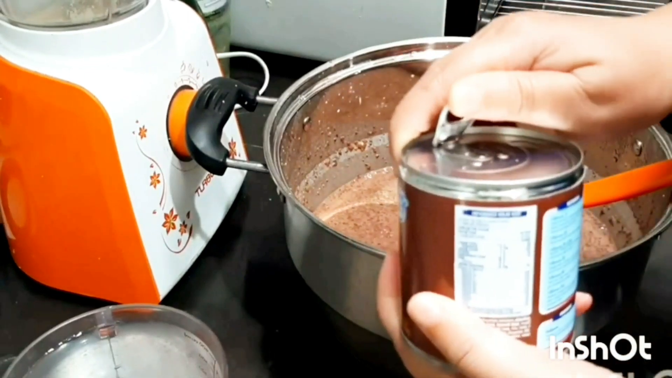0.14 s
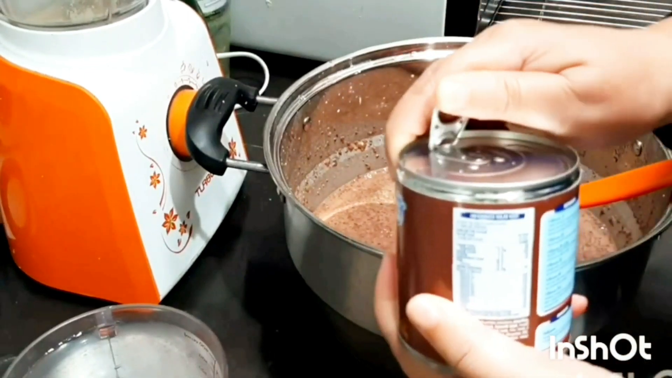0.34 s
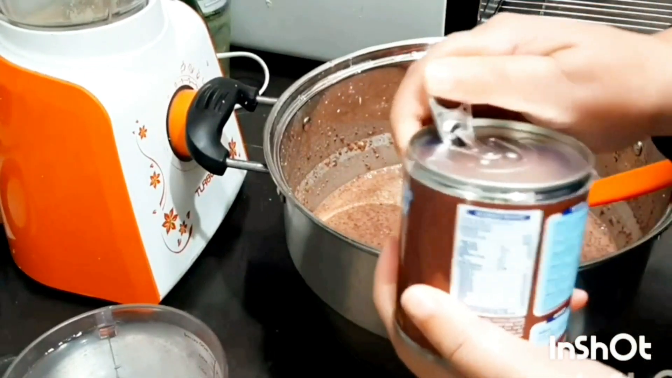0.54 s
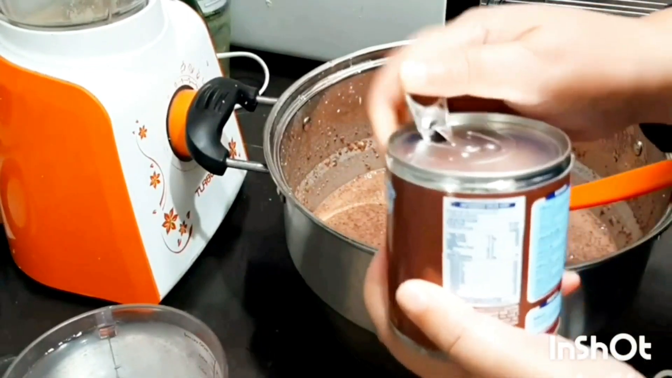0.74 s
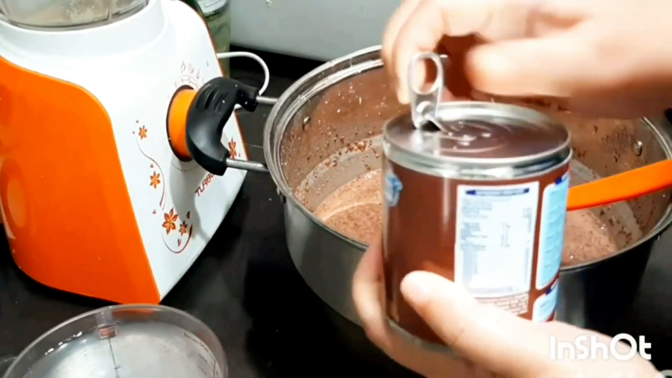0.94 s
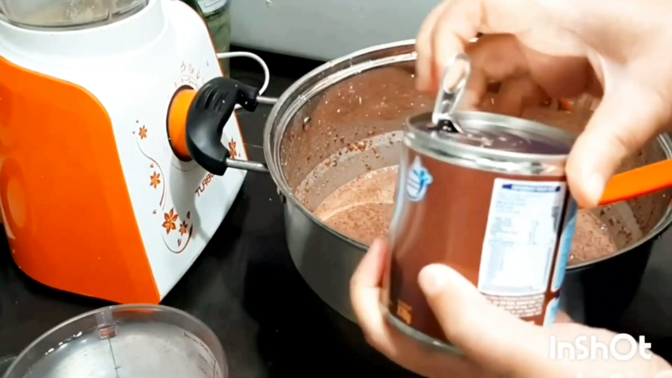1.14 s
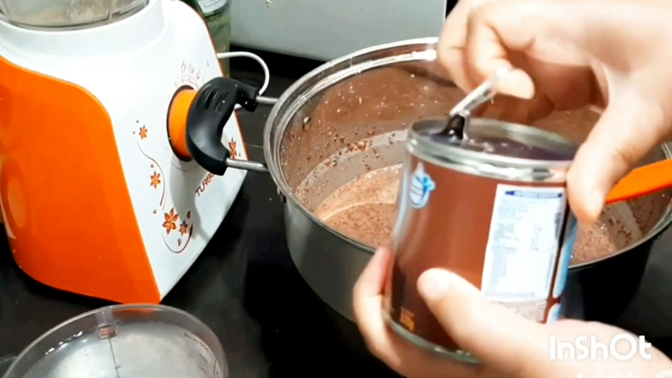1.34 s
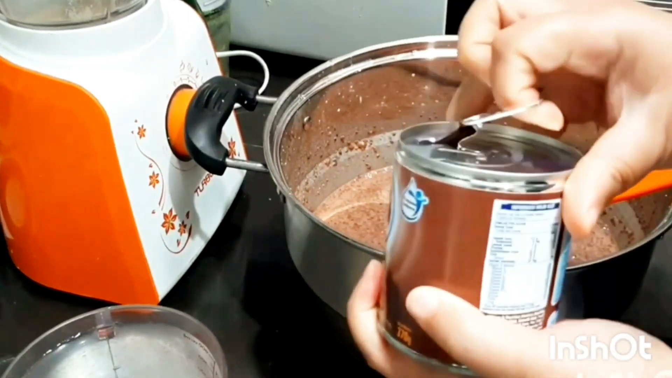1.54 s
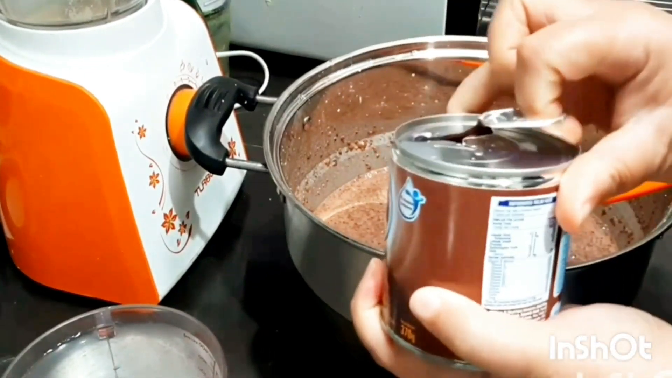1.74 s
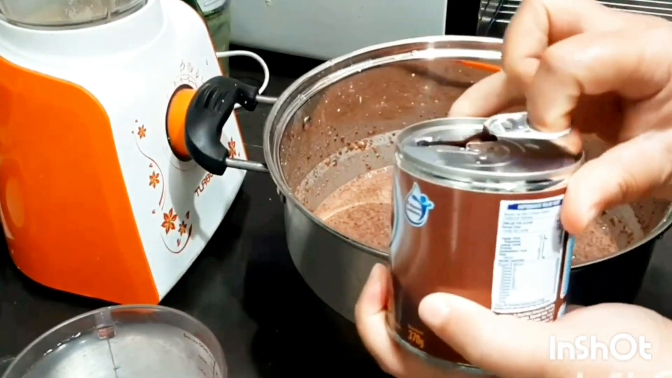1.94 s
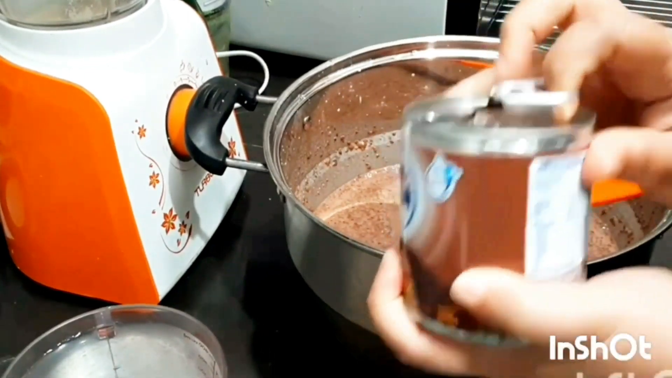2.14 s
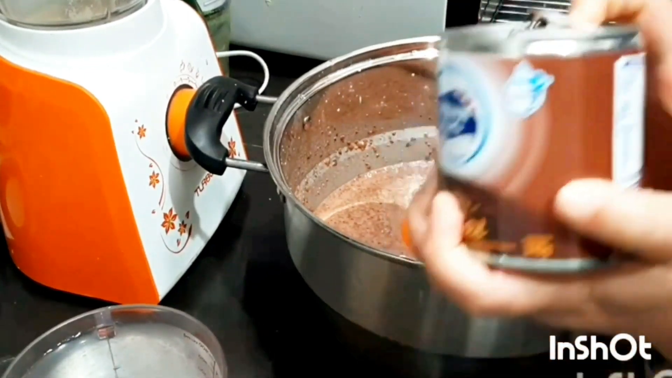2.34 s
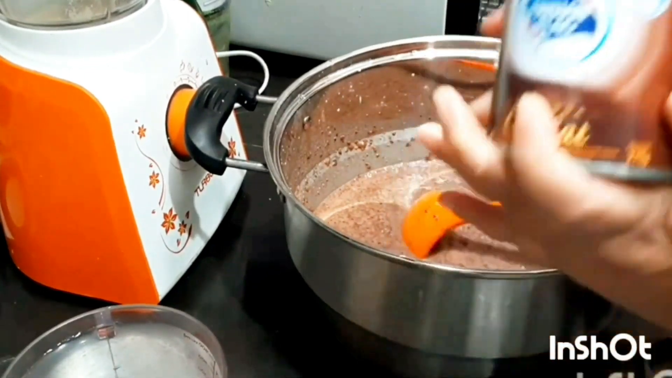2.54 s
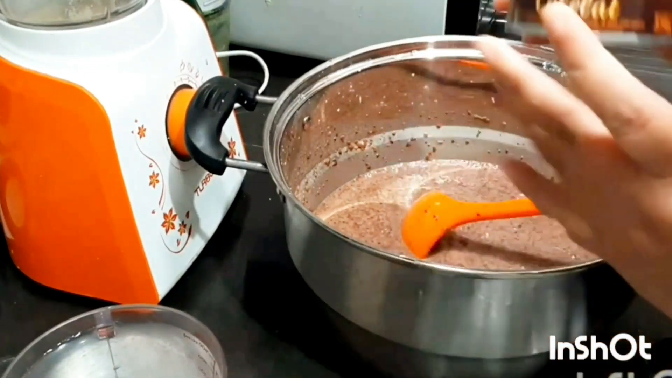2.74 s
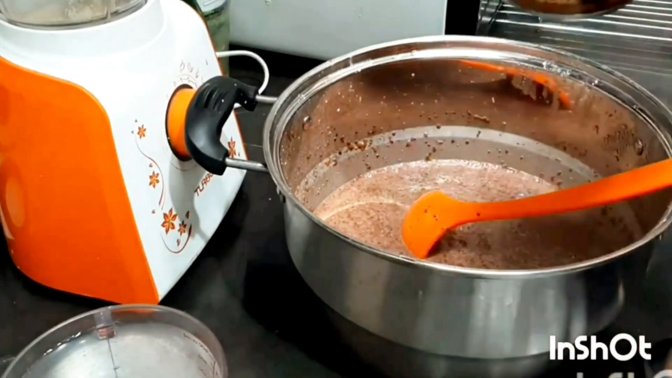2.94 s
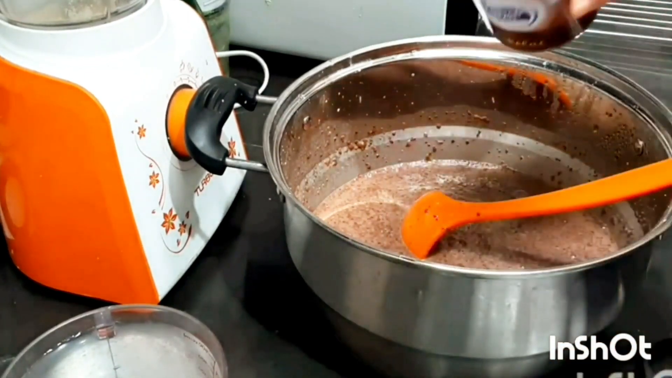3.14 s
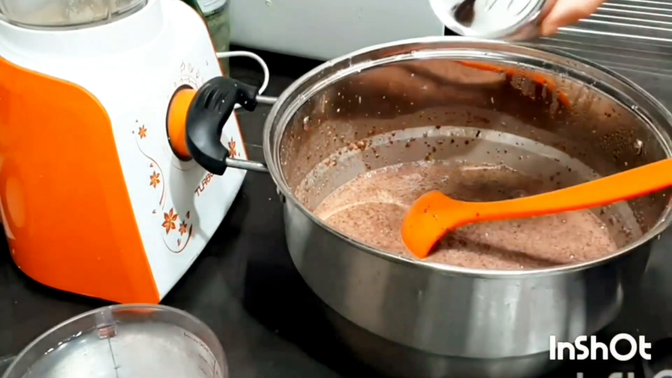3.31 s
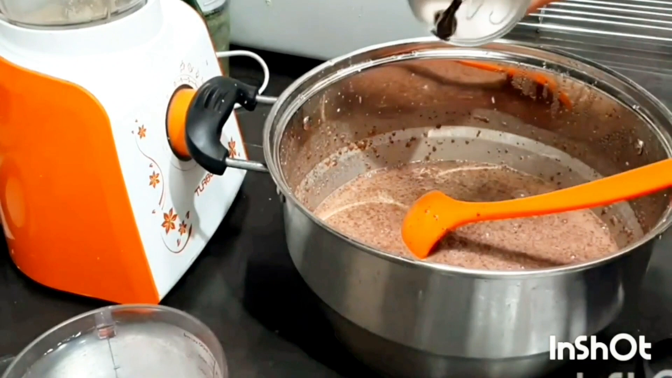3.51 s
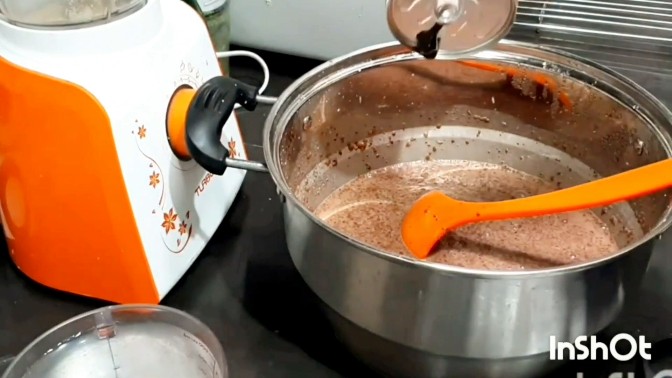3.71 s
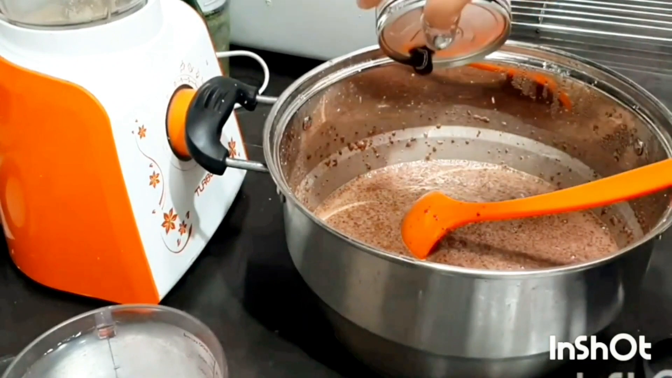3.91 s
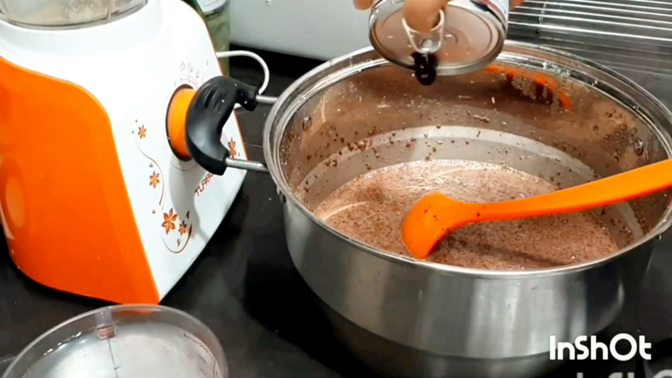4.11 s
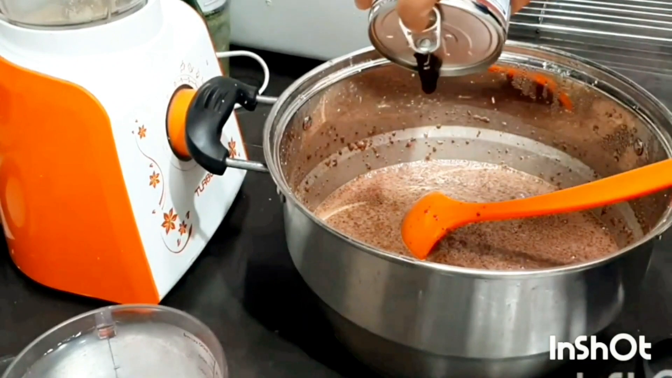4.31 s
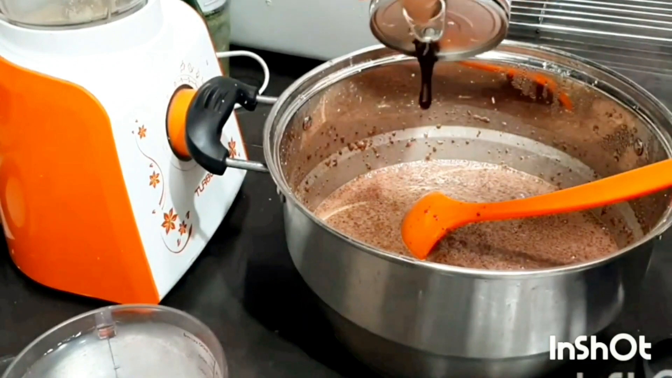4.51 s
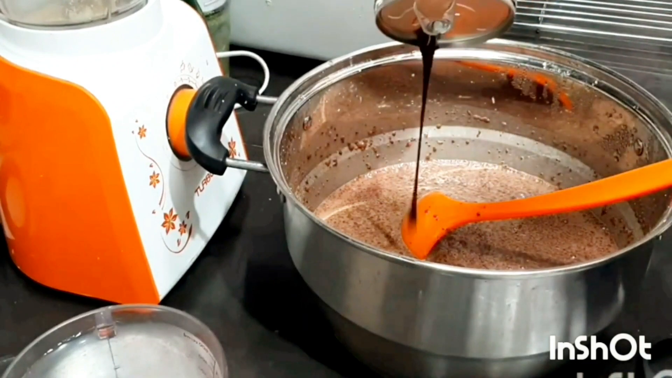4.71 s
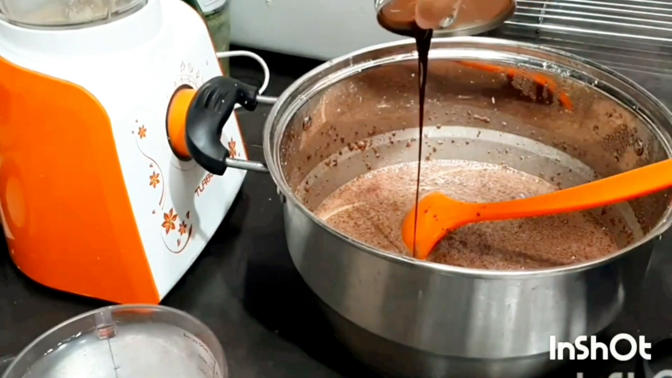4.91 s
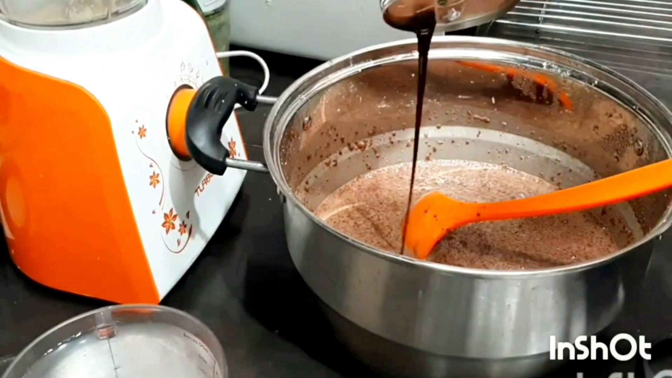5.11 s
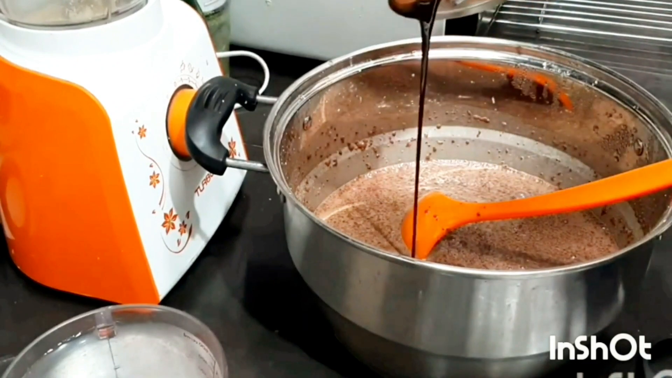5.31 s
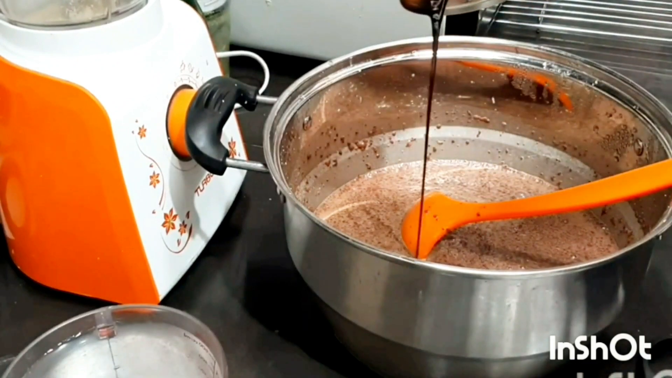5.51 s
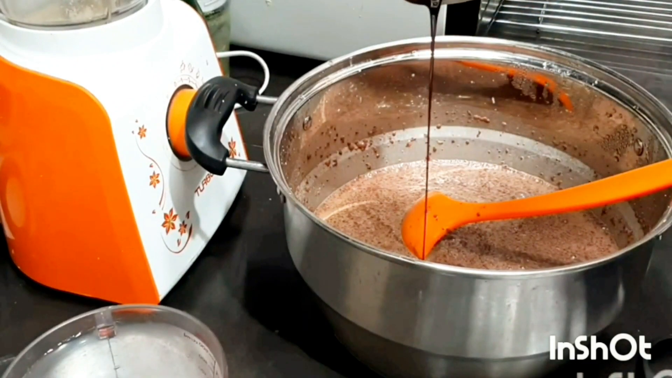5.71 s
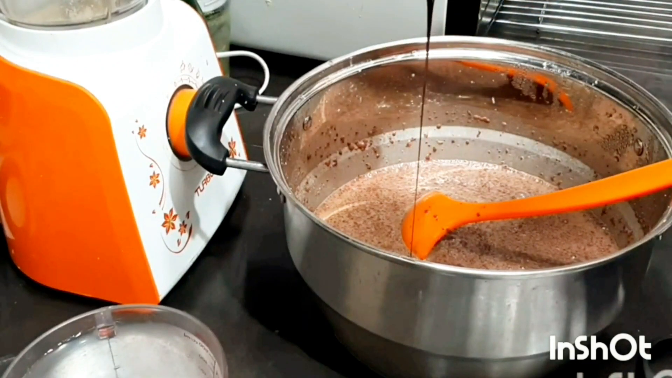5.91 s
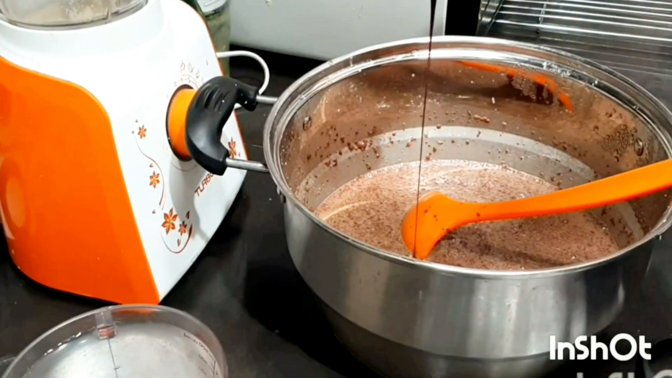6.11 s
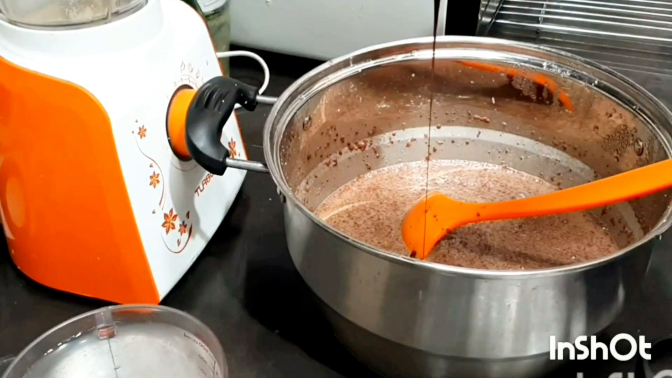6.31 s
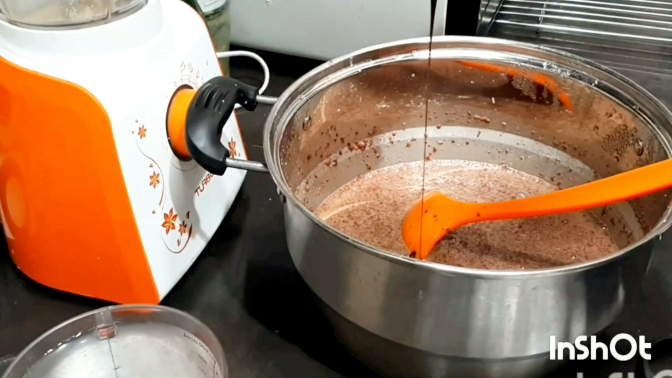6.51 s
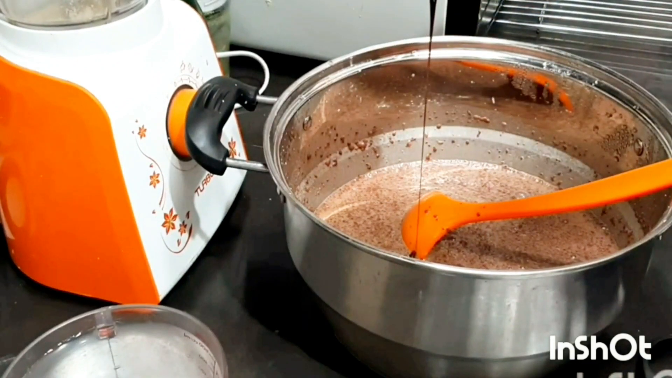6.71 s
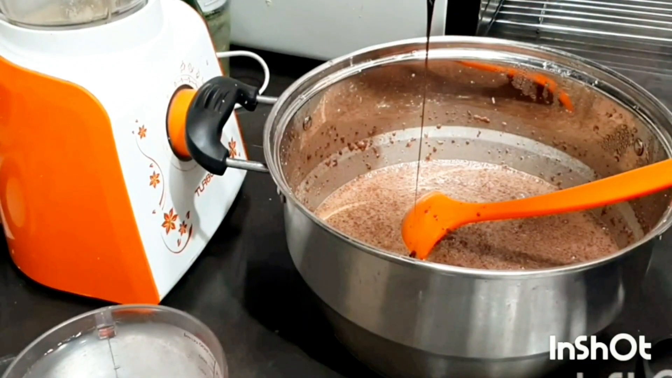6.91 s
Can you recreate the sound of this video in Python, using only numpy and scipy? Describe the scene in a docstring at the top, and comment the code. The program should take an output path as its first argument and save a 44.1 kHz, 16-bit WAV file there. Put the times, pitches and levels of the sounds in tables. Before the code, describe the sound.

One sharp snap of a can lid opening close by, over quiet dripping and trickling water and a faint low hum.

```python
"""In a small hard-walled kitchen, a ring pull cracks open a full tin close to a two-port phone.
The seal gives way in a few sharp impulses, torn metal clatters and the lid rings in its plate modes.
Off to one side water drips and trickles throughout: ticks, plops and short gushes over a grainy hiss.
Reflections from the walls smear the crack and the drips, and a faint low hum lies under it all."""
import sys
import numpy as np
from scipy import signal
from scipy.fft import rfft, irfft, next_fast_len
from scipy.io import wavfile
from scipy.ndimage import uniform_filter1d, map_coordinates

SR = 44100
rng = np.random.default_rng(int(sys.argv[2]) if len(sys.argv) > 2 else 0)


def inscribe(sig):
    """Save sig as 16-bit PCM at rate SR to the path in sys.argv[1].

    A 1-D sig is mono; a 2-D sig holds one channel per row.
    Samples are clipped to [-1, 1] before scaling.
    """
    pcm = np.round(np.clip(np.atleast_2d(sig).T, -1, 1) * 32767)
    wavfile.write(sys.argv[1], SR, pcm.astype(np.int16))


N = 306495

# Spectrum of the room tone. Each row: frequency in Hz, relative spectral level in dB.
HUM_SPECTRUM = [(24, -20), (42, 1.5), (65, 2.5), (128, 7), (214, -7.5), (260, -2), (390, -12.5),
                (537, -8.5), (635, -7.5), (700, -43), (910, -40), (1540, -120)]
# Reverberation of the kitchen. Each row: band frequency in Hz, t60 in seconds, gain in dB.
WALL_BANDS = [(432, 0.44, -15.5), (862, 0.56, -24), (2150, 0.44, -18.5), (5450, 0.47, -17),
              (11300, 0.45, -18.5), (14200, 0.48, -19.5)]
# Course of the trickle. Each row: time in seconds, base levels of lows, middle and treble in dB.
FLOW_LEVELS = [(0.0, -58, -58.5, -64.5), (0.25, -56, -59.5, -69), (0.44, -51, -53, -69),
               (0.6, -51, -56, -75), (0.81, -55.5, -57, -69), (0.96, -68, -64, -73), (1.0, -57, -61.5, -72),
               (1.16, -57, -55.5, -84), (1.31, -59.5, -68, -75), (1.43, -57.5, -62, -75),
               (1.72, -60, -60, -69), (1.9, -53.5, -55, -71.5), (2.22, -64, -59, -70.5),
               (2.42, -55, -59.5, -67.5), (2.59, -54, -53.5, -68), (2.77, -54, -57.5, -75),
               (3.06, -61, -59.5, -68.5), (3.41, -63.5, -58, -68), (3.7, -54, -60.5, -76),
               (3.93, -61, -58, -66.5), (4.24, -59, -59.5, -68), (4.39, -60, -63.5, -75),
               (4.65, -59.5, -47, -60), (4.74, -58.5, -62.5, -68), (4.9, -60.5, -59.5, -73),
               (5.03, -62, -54, -65.5), (5.21, -62.5, -58, -70.5), (5.59, -58.5, -64.5, -71.5),
               (6.19, -61, -59, -72), (6.39, -55.5, -55, -64.5), (6.64, -57, -64, -81),
               (6.83, -58, -55.5, -66.5), (6.95, -54, -60, -66)]
# Gurgle, trickle, spatter and fizz. Each row: low and high edge in Hz, grain share from 0 to 1,
# offset from the base level in dB, diffuse part relative to the direct part in dB.
FLOW_REGISTERS = [(900, 1900, 0.25, 0.5, -4), (1600, 3600, 0.36, -8.5, 2), (3000, 8200, 0.32, -5.5, 3),
                  (9000, 15800, 0.35, 2, 0)]
# Dry impacts of single drops. Each row: start in seconds, centre in Hz, level in dB.
DROP_TICKS = [(0.145, 8200, -34), (0.274, 1660, -31.5), (0.345, 7160, -32), (0.379, 1680, -30),
              (0.682, 11900, -36), (0.685, 1980, -34.5), (0.755, 814, -37.5), (0.773, 5630, -37.5),
              (0.807, 550, -55), (0.843, 640, -43), (0.852, 6900, -31.5), (0.887, 655, -45.5),
              (1.004, 3350, -35), (1.025, 12800, -26.5), (1.0284, 13100, -23.5), (1.207, 5840, -34),
              (1.067, 1920, -31.5), (1.135, 12100, -28), (1.222, 10500, -32), (1.354, 5520, -37),
              (1.45, 10400, -42), (1.47, 9300, -22), (1.556, 7140, -35), (1.612, 11200, -38),
              (1.522, 1445, -28), (1.662, 2800, -40.5), (1.731, 7760, -27), (1.745, 770, -48.5),
              (1.917, 1960, -37), (2.136, 7200, -27.5), (2.249, 3720, -38), (2.332, 6340, -42),
              (2.51, 6430, -32.5), (2.662, 5400, -33.5), (2.959, 5900, -52), (2.538, 1930, -31.5),
              (2.609, 12200, -34), (2.7, 13600, -32), (2.747, 3400, -35.5), (2.815, 6100, -37),
              (2.819, 6500, -29.5), (2.847, 4260, -25.5), (2.883, 2020, -31.5), (3.018, 12000, -44),
              (3.1272, 9150, -34.5), (3.174, 3500, -45), (3.297, 5550, -44), (3.445, 3130, -38.5),
              (3.468, 2800, -37), (3.531, 12400, -37), (3.678, 13900, -36), (3.7275, 3700, -26),
              (3.7296, 4900, -32), (3.748, 3750, -52), (3.792, 11500, -43), (4.012, 14100, -49),
              (4.027, 1470, -33.5), (4.079, 5550, -30.5), (4.293, 3460, -31.5), (4.692, 6000, -38),
              (4.812, 6760, -33), (4.4234, 11300, -48), (4.293, 14800, -40), (4.531, 6850, -29.5),
              (4.555, 3750, -29.5), (4.575, 1660, -26.5), (4.619, 6530, -24.5), (4.622, 1880, -25.5),
              (4.801, 13800, -37), (4.82, 1160, -30), (4.821, 520, -54.5), (5.572, 2280, -39.5),
              (2.739, 1880, -36), (2.445, 1960, -34), (6.753, 1960, -37), (4.902, 5750, -26),
              (4.988, 1750, -32), (4.99, 4250, -33), (4.996, 1970, -33.5), (5.074, 1940, -31.5),
              (5.073, 4960, -32.5), (5.13, 14000, -34.5), (5.383, 3400, -38), (5.45, 1730, -34),
              (5.452, 4000, -37.5), (5.646, 6440, -32.5), (5.749, 1310, -32.5), (5.883, 6400, -42),
              (5.996, 11100, -37), (5.799, 5360, -26), (6.305, 11000, -41), (6.329, 2150, -29.5),
              (6.472, 9100, -40), (6.383, 7700, -35.5), (6.526, 4300, -35), (6.529, 12800, -31.5),
              (6.529, 1174, -33.5), (6.623, 4720, -30.5), (6.675, 1190, -42), (6.767, 6960, -33),
              (6.835, 1480, -31.5), (6.86, 5600, -28), (6.928, 1380, -31)]
# Drops into standing water. Each row: start in seconds, centre in Hz, level in dB, decay in ms.
DROP_PLOPS = [(0.122, 820, -37, 44), (0.609, 1000, -41, 23), (1.033, 1240, -38, 32),
              (1.331, 908, -38.5, 42), (1.53, 816, -43.5, 100), (1.559, 1170, -41.5, 33),
              (1.65, 574, -61.5, 150), (1.7, 846, -50, 150), (2.1, 832, -51.5, 190),
              (1.963, 968, -40.5, 44), (2.46, 938, -40, 78), (2.56, 894, -45.5, 76), (2.856, 1360, -42, 52),
              (2.94, 835, -40, 87), (3.034, 1450, -52.5, 64), (3.179, 914, -44.5, 59),
              (3.256, 930, -46.5, 31), (3.517, 960, -35, 56), (4.07, 920, -54, 130),
              (3.885, 885, -43.5, 89), (4.232, 1060, -44.5, 17), (4.27, 963, -45, 64),
              (4.629, 947, -39, 42), (4.76, 850, -52.5, 33), (4.835, 893, -50, 45), (5.237, 859, -42, 107),
              (5.387, 870, -49, 36), (5.41, 1310, -40.5, 24), (5.527, 1040, -51, 35),
              (5.561, 1340, -40.5, 26), (5.698, 930, -46.5, 140), (5.94, 907, -47.5, 59),
              (6.114, 1064, -45.5, 56), (6.329, 1115, -35.5, 47), (6.53, 1063, -45, 75),
              (6.671, 1067, -38.5, 25), (6.719, 953, -50, 16), (6.838, 1283, -28.5, 28),
              (6.923, 995, -49, 33)]
# Short hissing gushes. Each row: start in seconds, centre in Hz, level in dB, decay in ms.
WATER_GUSHES = [(0.258, 5800, -38, 79), (0.367, 1860, -28, 32), (1.042, 13300, -34, 23),
                (1.769, 2270, -43, 110), (1.768, 5300, -36, 54), (1.769, 3960, -40, 140),
                (1.86, 3870, -42, 35), (1.95, 6270, -40.5, 66), (3.011, 1450, -31.5, 39),
                (3.233, 3690, -35, 53), (3.383, 1620, -33, 19), (3.645, 2340, -43, 62),
                (5.314, 1750, -41, 22), (5.42, 4270, -47, 340), (3.961, 5220, -31.5, 75),
                (3.979, 1870, -40, 79), (4.2, 4430, -40.5, 56), (4.507, 11550, -35, 60),
                (4.622, 4960, -29, 5.1), (5.858, 2560, -41, 120), (5.883, 4210, -37, 74),
                (6.068, 1780, -45, 17), (6.13, 1730, -38, 63), (6.17, 2450, -38.5, 54),
                (6.329, 4420, -39.5, 38)]
# The seal gives, the lid snaps back. Each row: start in seconds, level in dB, pitch in Hz, t60 in ms.
SEAL_CRACKS = [(.40206, -4, 3900, 2.5), (.4021, -15, 5200, 4), (.4019, -19, 7600, 2),
               (.4023, -12, 12600, 1.2), (.4025, -24, 2900, 6), (.4059, -13, 1900, 4),
               (.4045, -27, 780, 90)]
# Plate modes of the tin. Each row: frequency in Hz, level in dB, t60 in seconds.
LID_MODES = [(500.7, -44.5, 0.28), (758, -49, 0.49), (792.3, -40.5, 0.48), (1584, -53.5, 0.48),
             (2040, -43, 0.31), (2860, -56, 0.3), (3460, -57, 0.25), (3750, -51, 0.25), (4060, -54, 0.14),
             (3840, -47, 0.22), (4230, -55, 0.26), (4420, -35.5, 0.24), (4530, -48, 0.2),
             (5210, -45.5, 0.2)]

OPENING_S = SEAL_CRACKS[0][0]


def undb(db):
    """Amplitude ratio: tenfold for every 20 dB."""
    return 10 ** (np.asarray(db) / 20)


def unit(x):
    """Normalisation to an rms of 1."""
    return x / np.sqrt(np.mean(x ** 2))


def band(x, lo_hz, hi_hz):
    """Band-pass filtering with steep skirts."""
    sos = signal.butter(3, [lo_hz, min(hi_hz, .45 * SR)], "band", fs=SR, output="sos")
    return signal.sosfilt(sos, x)


def fluctuation(per_s):
    """Random modulation: linear glides between random values, with an rms of 1."""
    step = int(SR / per_s)
    held = np.repeat(rng.standard_normal(N // step + 1), step)
    return unit(uniform_filter1d(held, step)[:N])


def add(track, start_s, sound):
    """Superposition: a sound sums into the track from its start."""
    i = int(start_s * SR)
    track[i:i + len(sound)] += sound[:N - i]


def ring(hz, t60):
    """Free vibration of a damped oscillator, falling 60 dB in t60 seconds."""
    t = np.arange(int(t60 * SR) + 8) / SR
    return np.exp(-np.log(1000) * t / t60) * np.sin(2 * np.pi * hz * t)


def room_hum(level_db=-75):
    """Spectral shaping of steady noise gives a low hum, its deepest part stronger on the left."""
    log_f = np.log(np.fft.rfftfreq(N, 1 / SR) + 1)
    hz, db = np.transpose(HUM_SPECTRUM)
    shape = undb(np.interp(log_f, np.log(hz), db, right=-90))
    mid, side = rfft(rng.standard_normal((2, N))) * shape
    right_tilt = undb(np.interp(log_f, np.log([30, 300]), [-9, 3]))
    return undb(level_db) * unit(irfft([mid + .54 * side, (mid - .34 * side) * right_tilt], N))


def wall_echo(x, build_s=.011, slap_s=.028, slap_db=3.5):
    """Reverberation: dense reflections build up, then decay exponentially band by band."""
    t = np.arange(SR // 2) / SR
    mid, side = rng.standard_normal((2, len(t)))
    noise = np.array([mid + .75 * side, mid - .75 * side])
    hz = np.array(WALL_BANDS)[:, 0]
    edges = np.r_[60, np.sqrt(hz[1:] * hz[:-1]), 17000]
    tail = 0
    for (_, t60, db), lo, hi in zip(WALL_BANDS, edges, edges[1:]):
        tail += undb(db - 60 * t / t60) * band(noise, lo, hi)
    build_up = 1 - np.exp(-(t / build_s) ** 2)
    far_wall = undb(slap_db * np.exp(-((t - slap_s) / .008) ** 2))
    return signal.fftconvolve(x[None], tail * build_up * far_wall, axes=1)[:, :N]


def from_left(pair, lag_s=.00035, corner_hz=980):
    """Path difference: sound from the left reaches the right port late and duller; bass arrives alike."""
    f = np.fft.rfftfreq(N, 1 / SR)
    above_corner = 1 / (1 + (corner_hz / (f + 1)) ** 8)
    shade = undb(-3 * above_corner * np.sqrt(f / 5000))
    delay = np.exp(-2j * np.pi * f * lag_s * above_corner)
    return np.array([pair[0], irfft(rfft(pair[1]) * shade * delay, N)])


def trickle(grains_per_s=30, grain_s=.002, surge_db=2.2, flicker_db=2.2):
    """Running water as amplitude-modulated noise in four registers, with a direct and a diffuse part."""
    times, lows, middle, treble = np.transpose(FLOW_LEVELS)
    onsets = rng.random((5, N)) < grains_per_s / SR
    sizes = undb(np.minimum(3 * rng.exponential(size=(5, N)), 7))
    grains = signal.lfilter([1], [1, -np.exp(-1 / (grain_s * SR))], onsets * sizes)
    flickers = [fluctuation(per_s=20) for _ in range(5)]
    direct, diffuse = 0, 0
    for k, levels in enumerate([lows, middle, middle, treble]):
        lo, hi, share, offset_db, diffuse_db = FLOW_REGISTERS[k]
        db = np.interp(np.arange(N) / SR, times, levels) + offset_db
        # Each register surges alone, but shares flicker and grains with its neighbours.
        gain = undb(db + surge_db * fluctuation(per_s=9) + flicker_db * (flickers[k] + flickers[k + 1]))
        texture = share * unit(grains[k] + grains[k + 1]) + 1 - share
        hiss = band(texture * rng.standard_normal((3, N)), lo, hi)
        hiss = band(hiss, lo, SR)  # steepens the lower edge
        direct += gain * unit(hiss[0])
        diffuse += gain * undb(diffuse_db) * unit(hiss[1:])
    return direct, diffuse


def splashes(rows, octaves, rise_per_s=0, lump_db=3, scatter_s=.00005):
    """Impact excitation: a band of lumpy noise starts at once and dies; short ones have a dry snap."""
    out, t = np.zeros((2, N)), np.arange(int(.3 * SR)) / SR
    impulse = t == 0
    edge_ratio = 2 ** (octaves / 2)
    for (start, hz, db, decay_ms), noise in zip(rows, rng.standard_normal((len(rows), len(t)))):
        blow = 2 * np.sqrt(SR / hz / octaves) * impulse
        lumps = undb(lump_db * unit(uniform_filter1d(noise[::-1], 300)) * np.minimum(t / .01, 1))
        fade = np.exp(-(1000 * t / decay_ms) ** 1.3)
        body = band((noise + blow) * lumps * fade, hz / edge_ratio, hz * edge_ratio)
        body = map_coordinates(body, [(t + rise_per_s * t ** 2 / 2) * SR])  # upward glide
        snap = band((noise + 8 * impulse) * np.exp(-t / .0003), hz / 1.8, hz * 2.8)
        sound = undb(db) * (body / np.abs(body).max() + undb(6 - decay_ms) * snap / np.abs(snap).max())
        add(out[0], start, sound)
        # Drops land here and there, so each has its own lag between the ports.
        add(out[1], start + scatter_s * noise[-1], sound)
    return out


def drips():
    """Bandwidth and decay set timbre: ticks short and broad, plops narrow, gushes long and wide."""
    tick_hz = np.array(DROP_TICKS)[:, 1]
    tick_ms = 4.6 * (tick_hz / 4000) ** -.65  # higher ticks die sooner
    ticks = splashes(np.column_stack([DROP_TICKS, tick_ms]), octaves=.7)
    plops = splashes(DROP_PLOPS, octaves=.3, rise_per_s=.4, lump_db=3.5)
    return ticks + plops + splashes(WATER_GUSHES, octaves=.54)


def metal_clatter(decay_s=.007):
    """Broadband transient: torn metal clatters off the worktop; the jolt thumps mostly on the left."""
    out, t = np.zeros((2, N)), np.arange(SR // 10) / SR
    for port, thump_db in zip(out, [-42, -48.5]):
        noise = rng.standard_normal(len(t))
        rasp = band(noise, 1270, 7150) + undb(-7.5) * band(noise, 10600, 22000)
        add(port, OPENING_S, undb(-14) * np.exp(-t / decay_s) * rasp)
        add(port, OPENING_S, undb(thump_db) * ring(hz=76, t60=.05))
    return out


def tin_lid(flutter_db=4.5, flutter_cycles=16, side_db=-6):
    """Modal vibration: the seal cracks and the tin's plate modes ring with a rough, rasping flutter."""
    mid, side = np.zeros((2, N))
    for start, db, hz, t60_ms in SEAL_CRACKS:
        add(mid, start, undb(db) * ring(hz, t60_ms / 1000))
    for k, (hz, db, t60) in enumerate(LID_MODES):
        mode = ring(hz, t60)
        mode *= undb(db + flutter_db * fluctuation(hz / flutter_cycles)[:len(mode)])
        add(mid, OPENING_S, mode)
        # A quarter-cycle lag gives the mode a different phase at each port.
        add(side, OPENING_S + 1 / (4 * hz), (-1) ** k * undb(side_db) * mode)
    bass_cut = signal.butter(3, 400, "high", fs=SR, output="sos")  # a small tin radiates little bass
    return signal.sosfilt(bass_cut, [mid + side, mid - side])


def scene():
    """Direct and reflected sound superpose: tin in front, water to the left, in the same room."""
    lid, clatter, drops = tin_lid(), metal_clatter(), drips()
    direct_flow, diffuse_flow = trickle()
    echo = wall_echo(undb(-18) * (lid[0] + clatter[1]) + undb(-22) * drops[0])
    return room_hum() + echo + diffuse_flow + from_left(drops + direct_flow) + clatter + lid


def record(dry, dip_hz=8710, dip_width_hz=310, dip_db=-11, top_hz=15750):
    """Frequency response of the phone: its ports notch the upper treble and a low-pass cuts the top."""
    size = next_fast_len(N)
    f = np.fft.rfftfreq(size, 1 / SR)
    notch = undb(dip_db * np.exp(-((f - dip_hz) / dip_width_hz) ** 2))
    notched = irfft(rfft(dry, size) * notch, size)[:, :N]
    return signal.sosfilt(signal.ellip(10, .2, 80, top_hz, fs=SR, output="sos"), notched)


dry = scene()
out = record(dry)
inscribe(out)
```